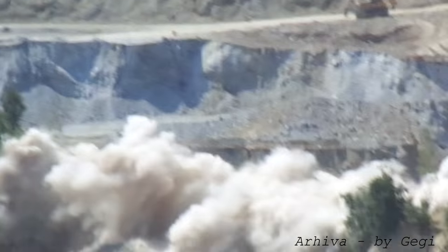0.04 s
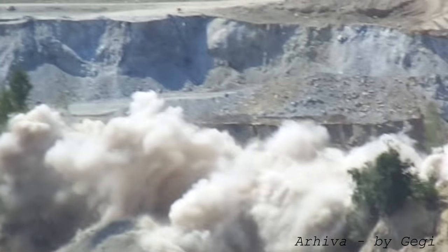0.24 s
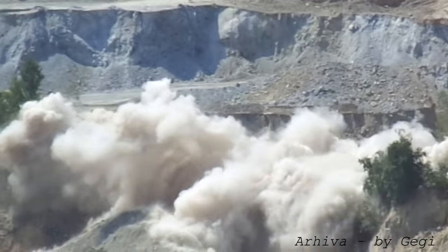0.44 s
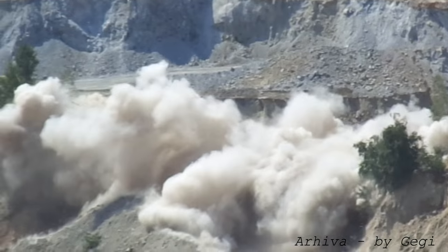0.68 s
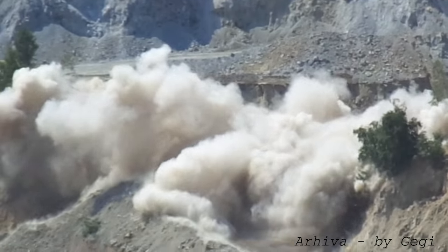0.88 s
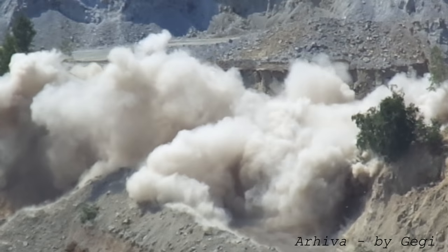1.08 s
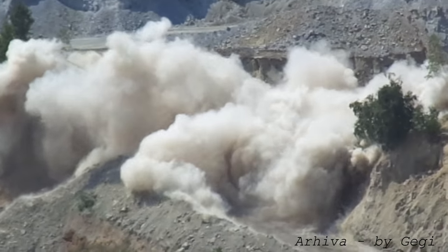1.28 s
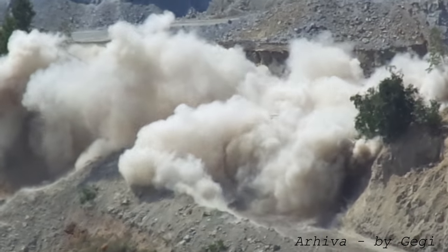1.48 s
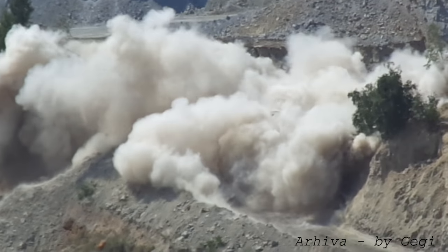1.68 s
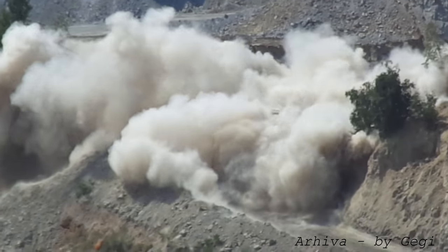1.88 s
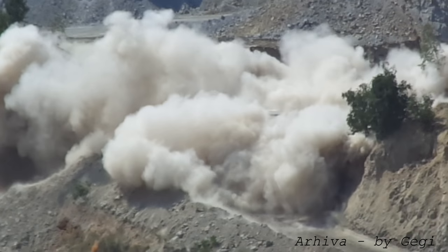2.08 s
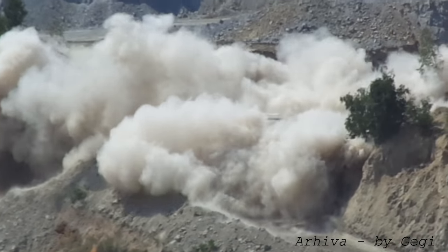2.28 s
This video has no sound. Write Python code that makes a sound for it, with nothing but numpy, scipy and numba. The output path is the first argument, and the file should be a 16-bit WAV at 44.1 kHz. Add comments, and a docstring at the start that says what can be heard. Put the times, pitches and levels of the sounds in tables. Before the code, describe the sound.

Explosive charges go off in a rapid ripple, followed by a fading rumble of collapsing rock.

```python
"""Quarry blast across the pit

The ground stirs first. Then a ripple of charges arrives as sharp shock fronts over a dense roar and
overloads the recorder, whose gain control ducks and slowly recovers. Falling rock and echoes from the
pit walls swell into a long rumble, with hissing grit and a hollow ring, and darken as they fade."""
import sys
import numpy as np
from scipy import signal
from scipy.fft import rfft, irfft, next_fast_len
from scipy.io import wavfile
from scipy.ndimage import uniform_filter1d, minimum_filter1d, map_coordinates
from numba import njit

SR = 44100
rng = np.random.default_rng(int(sys.argv[2]) if len(sys.argv) > 2 else 0)


def to_wav(sig):
    """Store sig (one row per channel, or 1-D mono) as 16-bit WAV at the path in sys.argv[1].

    Samples outside -1..1 are clipped; the rate is SR.
    """
    pcm = np.clip(np.atleast_2d(sig), -1, 1) * 32767
    pcm = np.round(pcm).astype(np.int16)
    wavfile.write(sys.argv[1], SR, pcm.T)  # frames by channels


N = 108045
T = np.arange(N) / SR
STIR_START_S, BLAST_START_S, BLAST_END_S, BLAST_T60_S = 0.059, 0.2035, 0.4, 0.28
CEILING = 0.98


def amp(db):
    """Decibels to gain."""
    return 10 ** (np.asarray(db) / 20)


def unit(x):
    """Scale to rms 1."""
    return x / np.sqrt(np.mean(x ** 2) + 1e-20)


def curve(rows):
    """Join (seconds, value) points, one value per sample."""
    return np.interp(T, *np.transpose(rows))


def decay(start_s, t60_s):
    """Full gain until start_s, then down 60 dB every t60_s."""
    return amp(-60 * np.maximum(T - start_s, 0) / t60_s)


def wobble(rate):
    """A smooth random curve, rate knots a second."""
    return map_coordinates(rng.standard_normal(2048), [T * rate], mode="wrap")


def filtered(x, response):
    """Filter x by a response given as a function of Hz."""
    size = next_fast_len(N + SR // 2)
    hz = np.fft.rfftfreq(size, 1 / SR)
    return irfft(rfft(x, size) * response(hz), size)[..., :N]


def soften(x, cutoff_hz):
    """A gentle low-pass rounds the steepest edges, as air does."""
    return filtered(x, lambda hz: 1 / (1 + 1j * hz / cutoff_hz))


def coloured(x, spectrum):
    """Shape x by (Hz, dB) points on a log frequency axis, at rms 1."""
    points_hz, db = np.transpose(spectrum)
    return unit(filtered(x, lambda hz: amp(np.interp(np.log(hz + 1), np.log(points_hz + 1), db))))


def noise(spectrum):
    """Coloured noise of rms 1."""
    return coloured(rng.standard_normal(N), spectrum)


def impacts(rate, spread_db):
    """Random blows of uneven size, rate a second."""
    hits = (rng.random(N) < rate / SR) * rng.choice([-1, 1], N)
    return unit(hits * amp(spread_db * rng.standard_normal(N)))


def ground_stir():
    """The shaken ground rustles until the air blast buries it."""
    # Tone of the rustle. Each row: frequency in Hz, relative level in dB.
    spectrum = [(25, -24), (80, -16), (145, -6), (240, -12.5), (400, -5.5), (550, -1), (1000, -2.5),
                (1600, -10), (3000, -23.5), (4000, -26), (5500, -60.5)]
    return noise(spectrum) * amp(-30) * (T < BLAST_END_S)


def grit_spray():
    """Thrown grit hisses, swelling and dying away."""
    # Tone of the grit. Each row: frequency in Hz, relative level in dB.
    spectrum = [(1500, -16.5), (3000, 1.5), (4500, -6), (6500, -14.5), (9000, -22), (14000, -40.5)]
    crest_s, rise_db_per_s, fall_db_per_s = 0.8, 40, 45.5
    level_db = -36 + np.minimum(rise_db_per_s * (T - crest_s), fall_db_per_s * (crest_s - T))
    grains = coloured(impacts(rate=9000, spread_db=4), spectrum)
    return grains * amp(level_db) * (T > BLAST_START_S)


def noise_band(phase, width_hz):
    """A narrow band of noise around a moving pitch."""
    return unit(wobble(2 * width_hz) * np.sin(phase) + wobble(2 * width_hz) * np.cos(phase))


def hollow_ring():
    """A resonance in the rumble and its broader overtone ring hollow and sink in pitch."""
    # Path of the resonance. Each row: time in seconds, centre in Hz, level in dB.
    path = [(.7, 470, -44), (0.961, 465, -30), (1.148, 450, -14), (1.37, 430, -40), (1.52, 410, -28),
            (1.65, 400, -23), (1.799, 415, -31), (1.93, 413.7, -29.5), (2.149, 370, -36.5),
            (2.248, 350, -26.5), (2.34, 340, -33), (2.45, 330, -36.5)]
    times, hz, db = np.transpose(path)
    phase = 2 * np.pi * np.cumsum(np.interp(T, times, hz)) / SR
    ring = noise_band(phase, width_hz=38) + amp(-5.5) * noise_band(2.14 * phase, width_hz=70)
    return ring * amp(np.interp(T, times, db)) * (T > BLAST_START_S)


def rock_thuds():
    """The heaviest rocks knock briefly through the rumble."""
    # Rocks landing. Each row: start in seconds, level in dB.
    landings = [(.978, 4), (2.108, -20)]
    out, pitch_hz = np.zeros(N), 642
    for start, db in landings:
        cycles = pitch_hz * np.maximum(T - start, 0)
        knock = np.sin(2 * np.pi * cycles) * (1 - np.exp(-cycles))
        out += amp(db) * knock * decay(start, t60_s=0.03)
    return out


def darken(x):
    """Later sound has crossed more air, so the tone tilts from bright to dull."""
    db_per_khz_s = 0.9
    hz, t, bins = signal.stft(x, SR, nperseg=512)
    khz = np.minimum(hz, 5000)[:, None] / 1000
    tilt_db = -db_per_khz_s * khz * (t - t.mean())
    return signal.istft(bins * amp(tilt_db), SR, nperseg=512)[1][:N]


def rockfall():
    """Countless blows and echoes merge into a rumble over heavy bass; the treble fades first."""
    # Tone of the rumble and of its bass. Each row: frequency in Hz, relative level in dB.
    rumble_spectrum = [(150, -33), (230, -21.5), (280, -9), (340, -4.5), (420, -1.5), (520, -1),
                       (650, -3.5), (760, -3.5), (920, -3.5), (1110, -8), (1260, -6), (1630, -13),
                       (2050, -15.5), (2350, -18.5), (2800, -21.5), (3950, -33), (5200, -48.5), (7000, -66),
                       (10000, -110)]
    bass_spectrum = [(20, -28), (45, -11.5), (70, -5), (103, -3.5), (140, 0.5), (210, 1), (255, -4.5),
                     (340, -28), (570, -82.5)]
    # Swell and fade of each. Each row: time in seconds, level in dB.
    rumble_levels = [(.2, -8), (.45, -19), (.52, -24), (.6, -28), (.68, -25), (.78, -17), (.88, -12.5),
                     (.97, -12), (1.08, -10.5), (1.18, -14.5), (1.3, -17.5), (1.41, -20), (1.52, -17.5),
                     (1.65, -18), (1.8, -21.5), (1.95, -22.5), (2.15, -26.5), (2.28, -25.5), (2.38, -27.5),
                     (2.45, -27.5)]
    bass_levels = [(.2, -33), (.45, -22), (.6, -29), (.76, -28), (.85, -20), (1, -19.5), (1.22, -22.5),
                   (1.33, -27.5), (1.7, -30), (2.05, -34), (2.45, -33.5)]
    blows = darken(impacts(rate=6000, spread_db=2.5))
    rumble = coloured(blows, rumble_spectrum) * amp(curve(rumble_levels) + 0.48 * wobble(rate=29))
    bass = coloured(impacts(rate=500, spread_db=1.5), bass_spectrum) * amp(curve(bass_levels))
    return (rumble + bass) * (T > BLAST_START_S)


def sizzle():
    """Each group of charges tears the rock with a hiss that dies quickly."""
    # Groups of charges. Each row: start in seconds, level in dB, seconds to fall 60 dB.
    volleys = [(.216, -16.5, 0.26), (.313, -23.5, 0.78), (0.393, -10, 0.078)]
    # Tone of the tearing. Each row: frequency in Hz, relative level in dB.
    spectrum = [(1200, -33), (2800, 2.5), (4000, -7.5), (6000, -9.5), (10000, -13), (12000, -23),
                (15000, -30.5)]
    envelope, attack_s = np.zeros(N), 0.0016
    for start, db, t60 in volleys:
        rise = 1 - np.exp(-np.maximum(T - start, 0) / attack_s)
        envelope += amp(db) * rise * decay(start, t60)
    return envelope * decay(BLAST_END_S, BLAST_T60_S) * noise(spectrum)


def wide_burst():
    """A short puff of noise that makes the first burst slightly wider."""
    # Tone of the puff. Each row: frequency in Hz, relative level in dB.
    spectrum = [(30, -8), (100, -5), (400, -3), (1000, -8), (2500, -7.5), (4000, -7.5), (7000, -18.5),
                (15000, -38)]
    centre_s, spread_s = 0.24, 0.018
    return noise(spectrum) * amp(-24.5) * np.exp(-0.5 * ((T - centre_s) / spread_s) ** 2)


def roar():
    """Rock and gas burst out while the charges fire, with a low thump at the start."""
    # Tone of the roar and of the thump. Each row: frequency in Hz, relative level in dB.
    body_spectrum = [(25, -24), (75, -8.5), (170, -4), (215, 0), (275, -18), (350, -10.5), (455, 2),
                     (530, -3), (680, -1.5), (810, -14.5), (960, -2), (1200, -12.5), (1700, -18.5),
                     (2020, -12), (2300, -28), (3000, -18.5), (4500, -25), (10000, -33.5), (15000, -68.5)]
    thump_spectrum = [(20, -4.5), (40, -12), (70, -0.5), (130, 7.5), (200, 11.5), (270, -24), (600, -42)]
    attack_s, punch_db, punch_s = 0.0022, 7.5, 0.018
    age = np.maximum(T - BLAST_START_S, 0)
    envelope = (1 - np.exp(-age / attack_s)) * decay(BLAST_END_S, BLAST_T60_S)
    body = soften(noise(body_spectrum), cutoff_hz=3070) * amp(-5.5 + punch_db * np.exp(-age / punch_s))
    thump = noise(thump_spectrum) * amp(-9) * decay(BLAST_START_S, t60_s=0.7)
    return envelope * (body + thump)


def shock_fronts():
    """Each charge sends a pressure jump, then suction; it scatters off rock and bounces off the ground."""
    # Fronts of the charges. Each row: arrival in seconds, level in dB, length of the push in ms.
    fronts = [(0.2031, -1, 1), (0.206, -9, 0.64), (0.2108, 7, .7), (.2173, -6, 0.26), (0.2246, 6, .4),
              (0.2317, 9, 0.1), (.2415, 6.5, 0.27), (.2524, 10.5, 0.47), (0.2554, -2, 0.17),
              (0.2632, 2, 0.17), (0.2761, 5, 0.41), (.2803, -10, .5), (0.2834, 1.5, 0.52), (0.2999, 1, .6),
              (0.3142, 13, 0.33), (0.3183, 19.5, 0.36), (0.3219, 0, .3), (0.3291, 19, 0.16),
              (0.3362, 10.5, 0.17), (0.345, 3, 0.31), (0.3479, 19.5, 0.2), (0.3578, 15, 0.22),
              (0.361, 11, 0.2), (0.371, 8.5, 0.12), (0.372, 7.5, 0.42), (0.3795, 13, .4),
              (0.3877, 10.5, .25), (.3958, 18, 0.24), (0.4008, 5.5, 0.24), (0.4087, 7, 0.24),
              (0.4156, 11, 0.22)]
    scatter_t60_s, ground_delay_s = 0.045, 0.00205
    out, t = np.zeros(N), T[:SR // 8]
    for start, db, push_ms in fronts:
        pushes = t / (push_ms / 1000)
        front = (1 - pushes) * np.exp(-pushes)
        tail = rng.standard_normal(len(t)) * amp(-60 * t / scatter_t60_s)
        scatter = signal.fftconvolve(front, tail / np.linalg.norm(tail))[:len(t)]
        out[round(start * SR):][:len(t)] += amp(db) * (front + amp(-10.5) * scatter)
    bounce = soften(np.interp(T - ground_delay_s, T, out), cutoff_hz=1500)
    return soften(soften(out + amp(-5) * bounce, cutoff_hz=9600), cutoff_hz=9600)


def scene():
    """All sources and a faint hiss come from straight ahead; only the first burst has some width."""
    blast = shock_fronts() + roar() + sizzle()
    debris = rockfall() + rock_thuds() + grit_spray() + hollow_ring()
    background = ground_stir() + amp(-58.5) * rng.standard_normal(N)
    mid = (blast + debris + background) * (T > STIR_START_S)
    side = wide_burst()
    return np.array([mid + side, mid - side])


@njit
def slew(wanted, down, up):
    """Follow a wanted gain, moving at most down or up each sample."""
    out, gain = np.empty_like(wanted), 0.0
    for i in range(len(wanted)):
        gain += min(max(wanted[i] - gain, -down), up)
        out[i] = gain
    return out


def gain_control(x):
    """The gain ducks under the blast, holds, then slowly recovers."""
    limit_db, hold_s, duck_db_per_s, recover_db_per_s = -0.5, 0.16, 64, 31
    peak_db = 20 * np.log10(np.abs(x).max(axis=0) + 1e-9)
    wanted_db = np.minimum(limit_db - peak_db, 0)
    half = int(hold_s * SR) // 2
    held_db = minimum_filter1d(wanted_db, 2 * half + 1, origin=half, mode="constant")
    return x * amp(slew(held_db, duck_db_per_s / SR, recover_db_per_s / SR))


def limiter(x, range_db, smooth_s):
    """A fast limiter of small range takes slight overshoots cleanly."""
    size = int(smooth_s * SR)
    needed = np.clip(CEILING / (np.abs(x).max(axis=0) + 1e-9), amp(-range_db), 1)
    return x * uniform_filter1d(minimum_filter1d(needed, 2 * size), size)


def record(dry):
    """What gets past the gain control and limiter clips; the highest treble is then cut off."""
    limited = limiter(gain_control(dry), range_db=1.5, smooth_s=0.002)
    return filtered(np.clip(limited, -CEILING, CEILING), lambda hz: hz < 15200)


dry = scene()
out = record(dry)
to_wav(out)
```